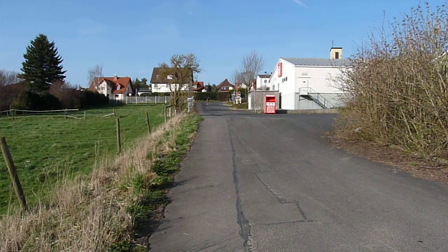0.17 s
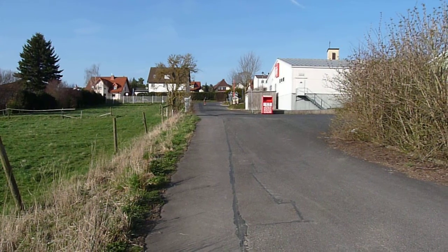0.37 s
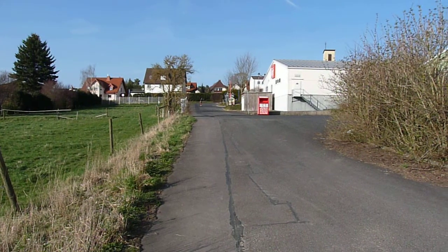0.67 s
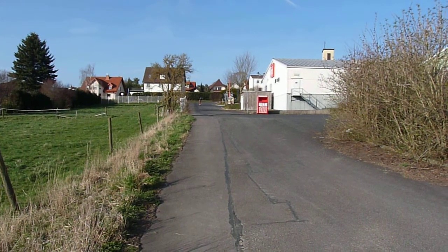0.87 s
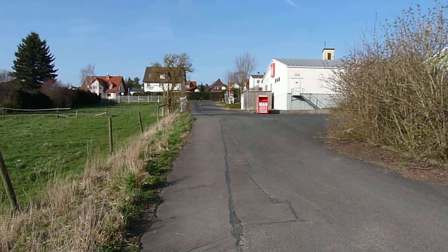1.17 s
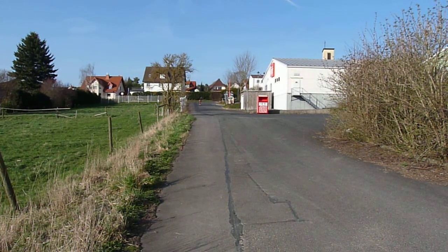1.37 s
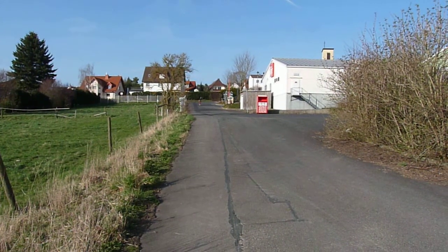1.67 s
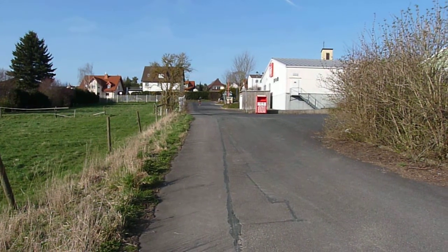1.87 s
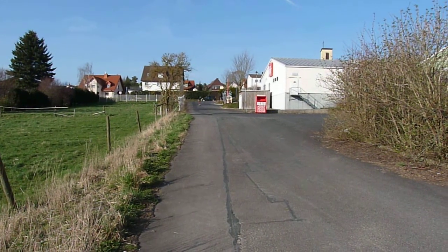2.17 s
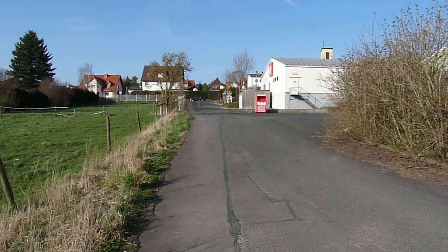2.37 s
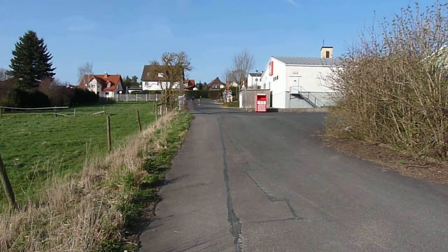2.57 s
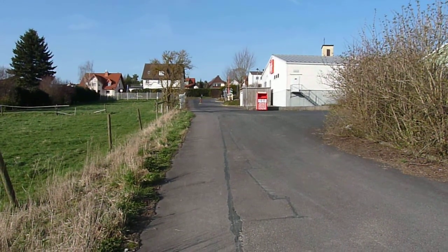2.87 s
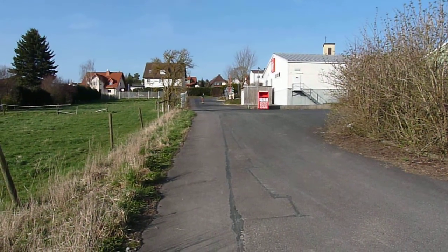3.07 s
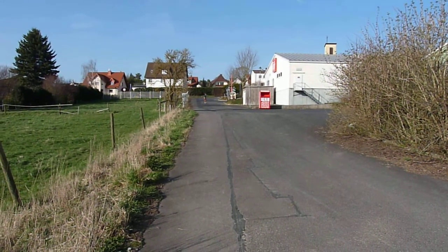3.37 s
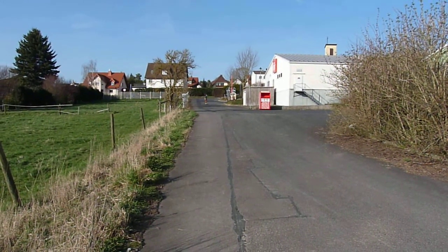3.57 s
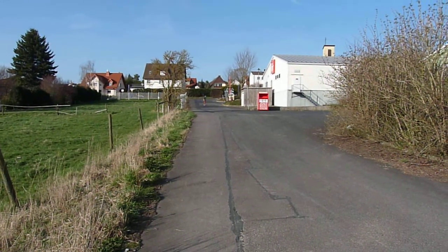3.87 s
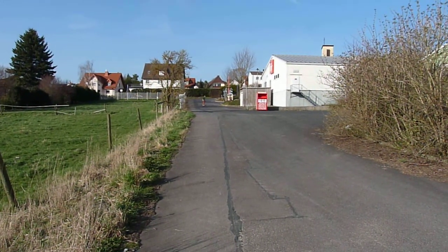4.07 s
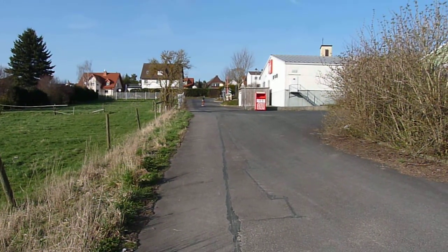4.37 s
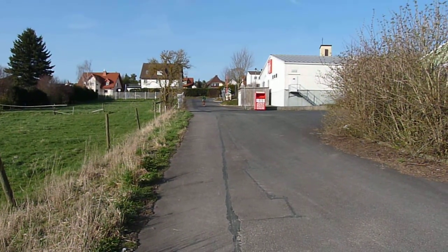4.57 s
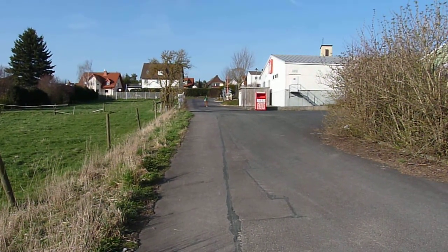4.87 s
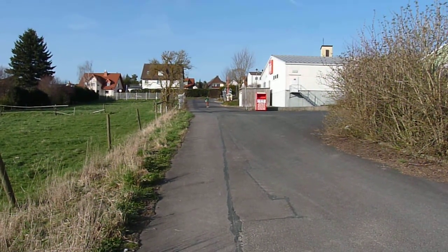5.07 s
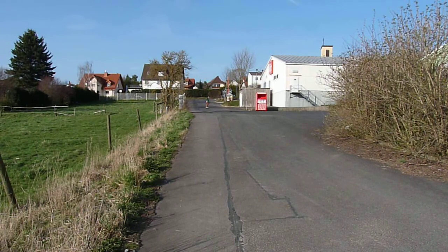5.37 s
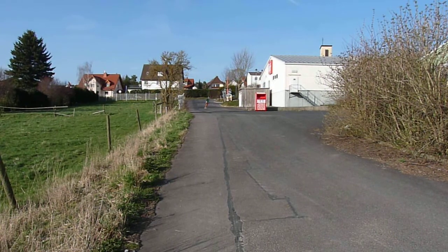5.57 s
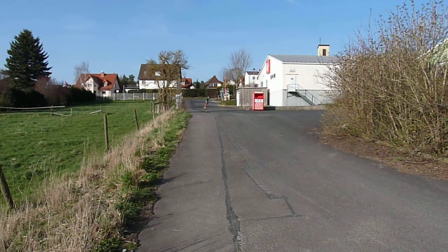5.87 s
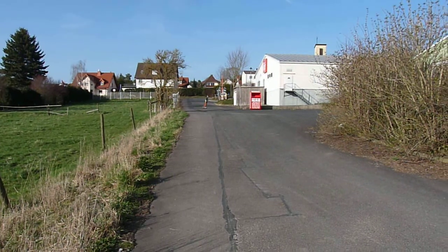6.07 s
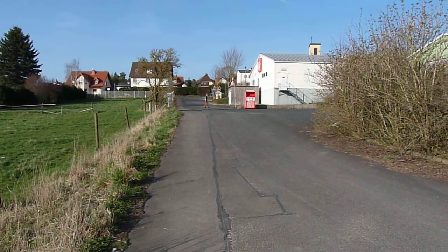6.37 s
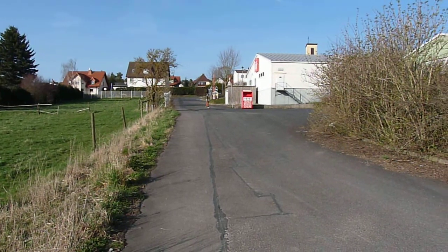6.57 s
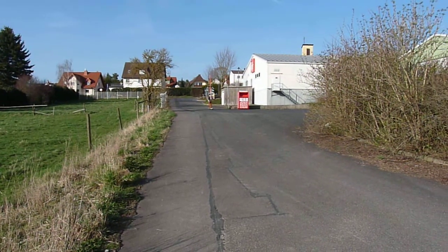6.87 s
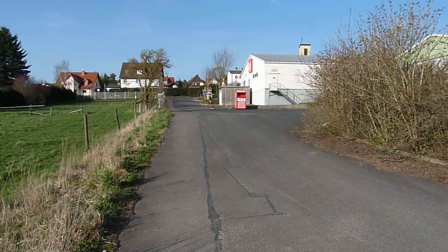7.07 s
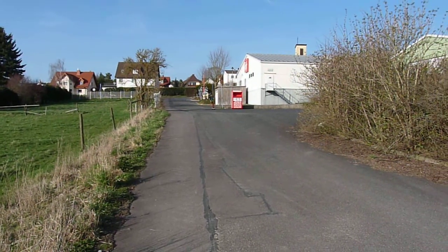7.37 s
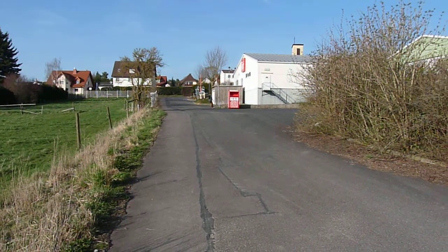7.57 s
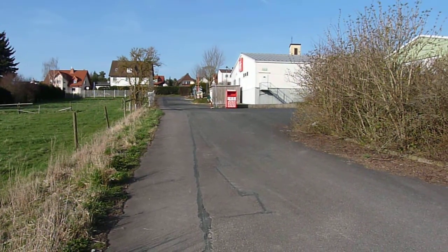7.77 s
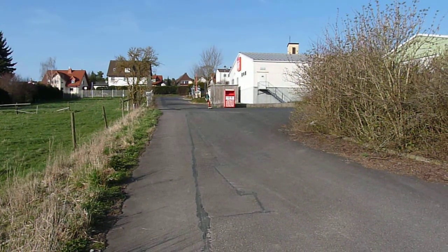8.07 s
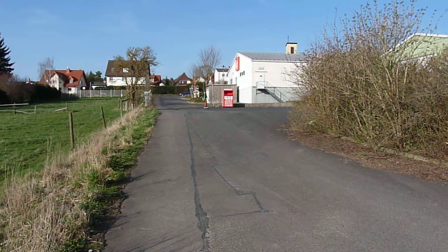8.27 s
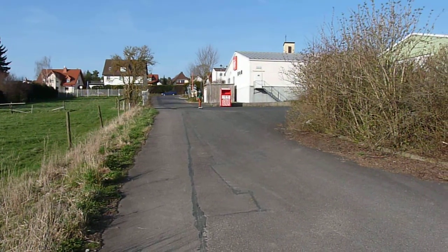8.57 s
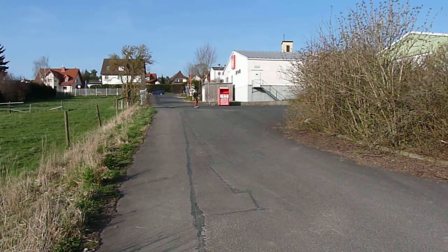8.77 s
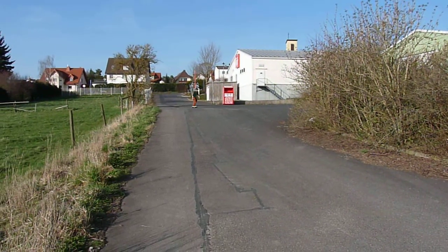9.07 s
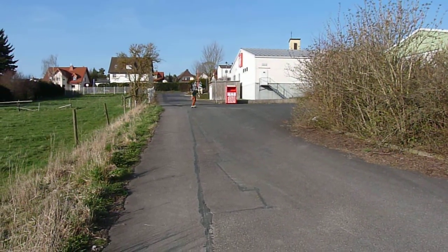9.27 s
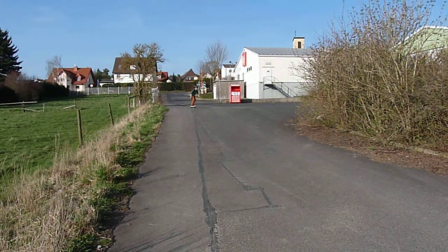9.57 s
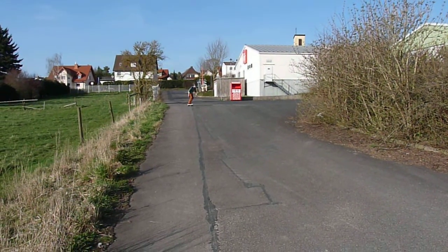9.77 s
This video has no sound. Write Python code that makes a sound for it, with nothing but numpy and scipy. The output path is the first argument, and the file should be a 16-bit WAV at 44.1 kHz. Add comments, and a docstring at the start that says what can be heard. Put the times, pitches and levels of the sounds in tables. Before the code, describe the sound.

Dull, irregular wind buffeting dominates first, close and dry, over a soft wash of far traffic. Blackbird whistles and a tiny distant scrape with a squeal slip between gusts. After six seconds it calms; rough wheel rumble emerges down the rural road, grainy and hollow, swelling unevenly with carves and single bumps, still some distance away. Narrow, slightly hissy small-camera sound with a thin outdoor tail.

```python
"""Gusts buffet the microphone for six seconds: shaped noise plus single pressure pulses.
A blackbird whistles in bending sine notes over distant traffic (coloured noise, one engine drone);
something scrapes briefly far down the road (dense impacts through resonances, a sine squeal).
Then a longboard rolls up a country road from far away, hard wheels drumming on coarse asphalt:
random grit impacts ring deck and wheels, with louder carves and single bumps."""
import sys
import numpy as np
from scipy import signal
from scipy.fft import rfft, irfft
from scipy.io import wavfile
from scipy.ndimage import uniform_filter1d

SR = 44100
rng = np.random.default_rng(int(sys.argv[2]) if len(sys.argv) > 2 else 0)


def waveform_to_disk(signal):
    """Save audio, clipped to [-1, 1], as 16-bit WAV at the path in sys.argv[1]."""
    frames = np.transpose(np.atleast_2d(signal))
    scaled = np.clip(frames, -1, 1) * 32767
    samples = np.round(scaled).astype(np.int16)
    wavfile.write(sys.argv[1], SR, samples)


N = 437472
TIME = np.arange(N) / SR  # [s]

# Levels in tables precede the trims in the functions; spectra are relative.
# far traffic, swell: (time [s], level [dB])
TRAFFIC_LEVEL = [(0, -51.5), (1.1, -53.5), (2, -51.5), (3, -50.5), (3.7, -49.5), (4.4, -47.5), (5, -50),
                 (5.6, -50.5), (6.4, -52), (7.5, -50.5), (9.92, -48)]
# far traffic, spectrum: (frequency [Hz], density [dB per Hz])
TRAFFIC_SPECTRUM = [(20, -20), (60, 0), (130, -4.5), (250, 2), (370, -1.5), (520, 1.5), (740, -4), (950, 0),
                    (1300, -7.5), (1750, -12), (2300, -21.5), (3200, -31.5), (6000, -51.5)]
# strokes of the far scrape: (start [s], length [s], first level [dB], last level [dB])
SCRAPE_STROKES = [(4.2, 0.19, -52.5, -48), (4.48, .08, -49, -52.5), (4.748, 0.026, -48, -48)]
# resonances of the scraped body: (frequency [Hz], width [Hz], gain [dB])
SCRAPE_RESONANCES = [(977, 130, -1.5), (1295, 150, 1.5), (1430, 250, -3), (1740, 250, -5)]
SCRAPE_RISE_S, SCRAPE_FALL_DB_PER_S = 0.024, 168
# blackbird notes, nominal pitch: (start [s], length [s], start pitch [Hz], middle pitch [Hz],
# end pitch [Hz], level [dB], trill depth [0-1])
BLACKBIRD_NOTES = [(0.071, 0.1, 2245, 2160, 1980, -61.5, .9), (.238, .05, 2700, 2440, 2310, -61.5, 0),
                   (.265, 0.15, 2380, 2206, 2126, -57.5, 0.03), (2.328, 0.14, 2490, 2440, 2320, -74.5, 0.2),
                   (2.88, .06, 2190, 2370, 2600, -68, 0.1), (2.93, .16, 2610, 2370, 2210, -67, 0.24),
                   (3.187, 0.11, 2450, 2370, 2230, -67.5, .1), (3.335, 0.087, 1816, 1860, 1900, -60.5, .6),
                   (3.411, 0.096, 2100, 2020, 2010, -56, 0.2), (3.492, .2, 2033, 2086, 1940, -55, 0),
                   (3.755, 0.077, 2150, 2240, 2390, -59, .1), (3.825, .085, 2330, 2200, 1970, -56.5, .15),
                   (3.96, 0.18, 2430, 2170, 2260, -71.5, .3), (4.127, 0.049, 3000, 2870, 2740, -75, 0.6),
                   (4.373, 0.24, 2710, 2320, 2890, -74.5, 0.04), (6.94, .08, 2200, 2210, 2300, -67, 0.4),
                   (7.004, .075, 2300, 2110, 1940, -59.5, 0.2), (7.163, .1, 2160, 2078, 2070, -54, 0.05),
                   (7.276, 0.098, 1990, 1906, 1920, -55, 0.33), (7.582, 0.14, 2560, 2670, 2510, -68, 0.07),
                   (7.698, 0.2, 2535, 2550, 2450, -63.5, 0.14), (9.347, .2, 3020, 3110, 3220, -73.5, 0.2)]
# gusts on the microphone: (start [s], length [s], first level [dB], last level [dB])
GUST_ROWS = [(.075, 0.069, -41, -29), (.16, 0.39, -22.5, -31), (.58, 0.28, -30, -38.5),
             (.9, 0.11, -36, -36), (1.13, .12, -33.5, -43.5), (1.365, 0.063, -34, -23),
             (1.5, 0.25, -34.5, -28), (1.89, 0.16, -39, -27.5), (2.11, 0.14, -28.5, -28.5),
             (2.29, .2, -26.5, -22.5), (2.53, .21, -25.5, -31.5), (2.79, 0.23, -26, -30.5),
             (3.1, 0.12, -33, -29.5), (3.3, .19, -33.5, -38.5), (3.555, 0.053, -40, -40),
             (3.67, .19, -50, -49.5), (4.1, 0.15, -36, -30), (4.27, 0.21, -38, -34),
             (4.51, 0.23, -33.5, -37.5), (4.84, 0.11, -40.5, -33), (5.16, 0.058, -36, -38.5),
             (5.31, .05, -49, -54), (5.6, 0.11, -38.5, -49), (5.89, 0.12, -42.5, -51.5)]
# a gust arrives quickly, drops away and leaves a weak wake that dies slowly
GUST_RISE_S, GUST_FALL_DB_PER_S, WAKE_DB, WAKE_FALL_DB_PER_S = 0.016, 299.5, -10.5, 38
# turbulence in a light gust: (frequency [Hz], density [dB per Hz])
LIGHT_GUST_SPECTRUM = [(15, -6), (35, -3.5), (65, 5.5), (120, 2.5), (200, -9.5), (350, -36.5), (700, -34.5),
                       (2000, -67)]
# turbulence in a strong gust: (frequency [Hz], density [dB per Hz])
STRONG_GUST_SPECTRUM = [(15, -25), (40, -15.5), (80, -11.5), (130, 1.5), (200, -3.5), (320, -12.5),
                        (500, -23.5), (900, -39.5), (2500, -78)]
# faint draught that never stops: (frequency [Hz], density [dB per Hz])
DRAUGHT_SPECTRUM = [(15, -9.5), (35, -5), (60, -0.5), (100, -7), (160, -6.5), (300, -24), (1000, -57.5)]
# gain of the wind's deep bass: (time [s], gain [dB])
BASS_GAIN = [(0, 1), (2, -2.5), (3, 1), (4.3, 5), (6, 2.5)]
# strongest eddies to hit the microphone: (time [s], peak level [dB])
STRONG_EDDIES = [(.213, -11), (.299, -8.5), (.378, -12), (.443, -13.5), (0.624, -22.5), (1.398, -14.5),
                 (1.412, -15), (1.432, -16), (1.734, -13.5), (2.05, -15), (2.134, -17.5), (2.375, -18.5),
                 (2.462, -9.5), (2.554, -13.5), (2.58, -12.5), (2.71, -16), (2.827, -16), (2.893, -15),
                 (2.921, -12), (3.229, -20), (4.144, -13), (4.169, -19), (4.385, -19.5), (4.436, -11.5),
                 (4.647, -20.5), (4.745, -24.5), (4.933, -23.5)]
BUFFET_CENTRE_HZ = 176
# board rolling nearer: (time [s], level [dB])
ROLL_LEVEL = [(6.2, -56.5), (6.5, -56.5), (6.8, -48), (7.2, -43), (7.65, -47), (8.05, -44.5), (8.35, -47),
              (8.7, -44), (9.2, -49), (9.45, -41), (9.92, -45.5)]
# carves, wheels biting sideways: (start [s], length [s], first level [dB], last level [dB])
CARVE_ROWS = [(6.88, 0.61, -53, -43.5), (8.64, 0.47, -45.5, -49), (9.38, 0.21, -46.5, -37),
              (9.76, 0.11, -45, -40)]
CARVE_RISE_S, CARVE_FALL_DB_PER_S = 0.028, 132
# deck resonances: (frequency [Hz], width [Hz], gain [dB])
DECK_RESONANCES = [(150, 72, -12), (250, 48, -3), (409, 94, -5.5), (500, 85, -0.5), (630, 244, -7.5)]
# wheel and truck resonances: (frequency [Hz], width [Hz], gain [dB])
WHEEL_RESONANCES = [(868, 70, -6), (934, 38.5, 4), (1009, 89, -3.5), (1233, 108, -11.5), (1740, 200, -24.5)]
# larger stones and cracks: (time [s], wheel ring peak [dB], deck knock peak [dB])
BUMP_ROWS = [(6.807, -55, -32.5), (6.842, -39, -48), (7.061, -44, -43), (7.373, -38.5, -49),
             (7.44, -46, -39), (7.622, -49, -45), (8.668, -33.5, -40), (8.689, -35, -41),
             (8.837, -32.5, -45), (8.941, -44, -27.5), (9.086, -38, -47), (9.45, -37, -43),
             (9.492, -32, -37), (9.54, -32, -33), (9.69, -33, -40)]
# recorder hiss: (frequency [Hz], density [dB per Hz])
HISS_SPECTRUM = [(100, 2.5), (3000, 0.5), (7300, 0.5), (7900, -3.5), (8400, -13), (8900, -31.5)]
OPEN_S, BAND_EDGE_HZ = .072, 8800


def amp(db):
    """Decibels to gain."""
    return 10 ** (np.asarray(db) / 20)


def evened(x):
    """Scales to rms 1."""
    return x / np.sqrt(np.mean(x ** 2) + 1e-20)


def level(s, db):
    """A dB curve as gain per sample, fading at 60 dB/s beyond its ends."""
    outside_s = np.maximum(np.maximum(s[0] - TIME, TIME - s[-1]), 0)
    return amp(np.interp(TIME, s, db) - 60 * outside_s)


def add(mix, s, sound):
    """Mixes a sound in at time s, in place."""
    part = mix[max(round(s * SR), 0):][:len(sound)]
    part += sound[:len(part)]


def noise(spectrum):
    """Noise of rms 1 with the given spectrum."""
    hz, db = np.transpose(spectrum)
    bin_hz = np.fft.rfftfreq(N, 1 / SR)
    gain = amp(np.interp(np.log(bin_hz + 1), np.log(hz), db))
    return evened(irfft(rfft(rng.standard_normal(N)) * gain, N))


def wander(rate_hz):
    """Random drift of rms 1, low-passed at rate_hz."""
    rolloff = 1 + (np.fft.rfftfreq(N, 1 / SR) / rate_hz) ** 4
    return evened(irfft(rfft(rng.standard_normal(N)) / rolloff, N))


def swells(rows, rise_s, fall_db_per_s):
    """Gain of a row of swells: each rises, holds while its level drifts, then dies away."""
    power = np.zeros(N)
    t = TIME[:SR * 2]
    for s, length_s, first_db, last_db in rows:
        db = np.interp(t, [0, length_s], [first_db, last_db])
        db -= fall_db_per_s * np.maximum(t - length_s, 0)
        add(power, s, (np.minimum(t / rise_s, 1) * amp(db)) ** 2)
    return np.sqrt(power)


def random_sizes(spread_db):
    """Uneven strengths of random sign, one per sample."""
    return amp(spread_db * np.minimum(rng.exponential(1, N), 3)) * rng.choice([-1, 1], N)


def grit(per_s, spread_db, patchy_db):
    """Impacts on stones of uneven size, lying in coarser and finer patches."""
    size = random_sizes(spread_db)
    return size * (rng.random(N) < per_s / SR) * amp(patchy_db * wander(rate_hz=28))


def ring(x, modes):
    """Drives a set of resonances; neighbours swing in opposite senses."""
    out = 0
    for k, (hz, width_hz, db) in enumerate(modes):
        b, a = signal.iirpeak(hz, hz / width_hz, SR)
        out = out + (-1) ** k * amp(db) * signal.lfilter(b, a, x)
    return out


def far(x, edge_hz):
    """Distance takes the treble away."""
    sos = signal.butter(N=4, Wn=min(edge_hz, SR / 3), fs=SR, output="sos")
    return signal.sosfilt(sos, x)


def outdoors(x, wet_db, t60_s):
    """Hedges and house walls scatter a thin tail of sparse, decaying echoes."""
    t = TIME[:SR]
    echoes = rng.standard_normal(SR) * (rng.random(SR) < 900 / SR)
    tail = echoes * amp(-60 * t / t60_s) * (t > .012)
    return x + amp(wet_db) * signal.fftconvolve(x, tail / np.linalg.norm(tail))[:N]


def traffic(swell_db=0.8, drone_hz=248, drone_db=-63):
    """Tyre noise from far roads; one engine drone stands out for a while."""
    wash = level(*np.transpose(TRAFFIC_LEVEL)) * noise(TRAFFIC_SPECTRUM)
    wash *= amp(swell_db * wander(rate_hz=12))
    drone_pitch_hz = drone_hz * (1 + 0.009 * wander(rate_hz=14.7))
    drone = np.sin(2 * np.pi * np.cumsum(drone_pitch_hz) / SR)
    return wash + amp(drone_db) * level([5.2, 6.1, 6.6, 7.2], [-3, 5.5, 6.5, -16]) * drone


def scrape(squeal_hz=1325, squeal_db=-47):
    """Dense impacts ring a far body, which catches briefly in an unsteady squeal."""
    impacts = grit(per_s=6000, spread_db=1, patchy_db=1.3)
    rub = evened(far(ring(impacts, SCRAPE_RESONANCES), edge_hz=1950))
    rub *= swells(SCRAPE_STROKES, SCRAPE_RISE_S, SCRAPE_FALL_DB_PER_S)
    pitch_hz = squeal_hz * (1 + 0.0051 * wander(rate_hz=48))
    squeal = np.sin(2 * np.pi * np.cumsum(pitch_hz) / SR)
    return rub + amp(squeal_db) * level([4.29, 4.335, 4.39, 4.46], [-31, 2.0, -0.5, -19]) * squeal


def blackbird(trill_hz=47, swing_hz=90, fade_s=0.017):
    """Clean whistles, each bending along one arc; a trill breaks a note into quick arched chirps."""
    out = np.zeros(N)
    drift = 1 + .003 * wander(rate_hz=50)
    for s, length_s, start_hz, middle_hz, end_hz, db, trill in BLACKBIRD_NOTES:
        t = np.arange(0, length_s, 1 / SR)
        arc = np.polyfit([0, .5, 1], [start_hz, middle_hz, end_hz], 2)
        hz = np.polyval(arc, t / length_s) * np.interp(s + t, TIME, drift)
        beat = 2 * np.pi * trill_hz * t
        hz += swing_hz * trill * np.sin(beat - np.pi / 4)
        fade = signal.windows.tukey(len(t), min(2 * fade_s / length_s, 1))
        loudness = np.sqrt(2) * amp(db) * (1 - trill * np.cos(beat)) * fade
        add(out, s, loudness * np.sin(2 * np.pi * np.cumsum(hz) / SR))
    return out


def eddies(per_s, spread_db, top_hz):
    """Separate swirls of all sizes; the small ones are weak and flap higher."""
    t = np.arange(-900, 900) / SR
    out = np.zeros(N)
    for hz in np.geomspace(90, top_hz, num=8):
        phase = (np.pi * hz * t) ** 2
        pulse = (1 - 2 * phase) * np.exp(-phase)
        hits = random_sizes(spread_db) * (rng.random(N) < per_s / SR)
        out += signal.oaconvolve(hits, pulse, "same") / hz
    return evened(out)


def wind(trim_db=-2, light_db=-46, strong_db=-26, eddy_db=0, flutter_db=2.5, draught_db=-62):
    """Turbulence at the microphone: stronger gusts shed smaller eddies and sound brighter."""
    wake = amp(WAKE_DB) * swells(GUST_ROWS, GUST_RISE_S, WAKE_FALL_DB_PER_S)
    gust = np.maximum(swells(GUST_ROWS, GUST_RISE_S, GUST_FALL_DB_PER_S), wake)
    gust_db = 20 * np.log10(gust + 1e-9)
    force = np.clip((gust_db - light_db) / (strong_db - light_db), 0, 1)
    air = np.sqrt(1 - force) * noise(LIGHT_GUST_SPECTRUM) + np.sqrt(force) * noise(STRONG_GUST_SPECTRUM)
    air *= amp(flutter_db * wander(rate_hz=83))
    air += amp(eddy_db) * eddies(per_s=13, spread_db=4.5, top_hz=308)
    air /= np.sqrt(uniform_filter1d(air ** 2, size=4400) + 1e-9)  # the gusts alone set the slow swell
    deep = signal.sosfiltfilt(signal.butter(N=2, Wn=115, fs=SR, output="sos"), air)
    air += (amp(np.interp(TIME, *np.transpose(BASS_GAIN))) - 1) * deep  # later gusts boom more
    return amp(trim_db) * gust * air + amp(draught_db) * noise(DRAUGHT_SPECTRUM)


def buffets(trim_db=-1, cycles=0.4, flap_db=-21, flap_ratio=1.5, scatter=0.12):
    """Each strong eddy is one push and pull of pressure, with a smaller, quicker flap inside it."""
    t = np.arange(-700, 700) / SR

    def pulse(hz, turn):
        """Oscillation under a bell-shaped envelope a fraction of a cycle wide."""
        return np.cos(2 * np.pi * (hz * t + turn)) / np.cosh(np.pi / 2 * hz * t / cycles)

    out = np.zeros(N)
    draws = rng.uniform(-1.03, 1, (len(STRONG_EDDIES), 3))
    for (s, db), (size, push_turn, flap_turn) in zip(STRONG_EDDIES, draws):
        hz = BUFFET_CENTRE_HZ * (1 + scatter * size)
        push, flap = pulse(hz, push_turn), pulse(hz * flap_ratio, flap_turn)
        add(out, s + t[0], amp(db + trim_db) * (push + amp(flap_db) * flap))
    return out


def bumps(wheel_db=-1, deck_db=-1):
    """Larger stones and cracks knock the board's resonances singly."""
    blow = signal.unit_impulse(4096)
    clack = far(ring(blow, WHEEL_RESONANCES), edge_hz=1700)
    knock = far(ring(blow, DECK_RESONANCES), edge_hz=1200)
    clack, knock = clack / abs(clack).max(), knock / abs(knock).max()
    out = np.zeros(N)
    for s, ring_db, knock_db in BUMP_ROWS:
        add(out, s - .002, amp(ring_db + wheel_db) * clack + amp(knock_db + deck_db) * knock)
    return out


def board(deck_db=-3.0, straight_db=-7, carve_db=-1):
    """Road grit rings deck and wheels as the board comes nearer; the wheels ring out in each carve."""
    roll = level(*np.transpose(ROLL_LEVEL))
    carve = swells(CARVE_ROWS, CARVE_RISE_S, CARVE_FALL_DB_PER_S)
    bite = np.hypot(amp(straight_db) * roll, amp(carve_db) * carve)
    deck_grit = grit(per_s=1500, spread_db=-1.5, patchy_db=-0.5)
    wheel_grit = grit(per_s=650, spread_db=3.5, patchy_db=2.5)
    deck = evened(far(ring(deck_grit, DECK_RESONANCES), edge_hz=1900))
    wheels = evened(far(ring(wheel_grit, WHEEL_RESONANCES), edge_hz=2900))
    return amp(deck_db) * roll * deck + bite * wheels


def scene():
    """Wind at the microphone, dry; road and bird with their outdoor tails; far traffic."""
    bird = outdoors(blackbird(), wet_db=-10.5, t60_s=0.69)
    road = outdoors(board() + bumps() + scrape(), wet_db=-13.0, t60_s=0.2)
    return (traffic() + bird + wind() + buffets() + road)[None]


def record(dry, hiss_db=-68.0, whine_hz=6666.6, whine_db=-83, offset=-.009):
    """A small camera adds hiss, a thin whine and a steady offset, opens after a moment, has a narrow band."""
    whine = np.sqrt(2) * amp(whine_db) * np.sin(2 * np.pi * whine_hz * TIME)
    opened = np.clip((TIME - OPEN_S) / .002, 0, 1)
    wet = (dry + amp(hiss_db) * noise(HISS_SPECTRUM) + whine + offset) * opened
    band = signal.firwin(511, BAND_EDGE_HZ, window=("kaiser", 9), fs=SR)
    return signal.oaconvolve(wet, band[None], "same")


dry = scene()
out = record(dry)
waveform_to_disk(out)
```